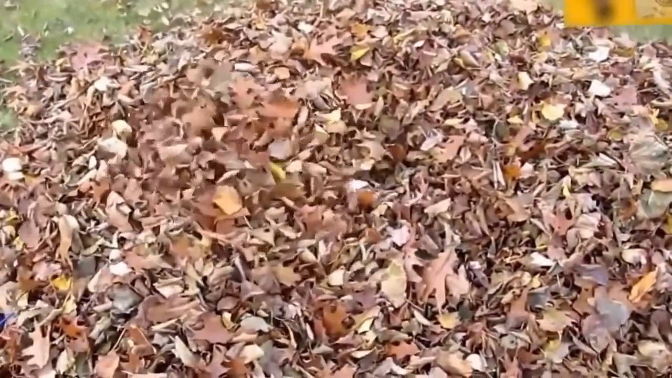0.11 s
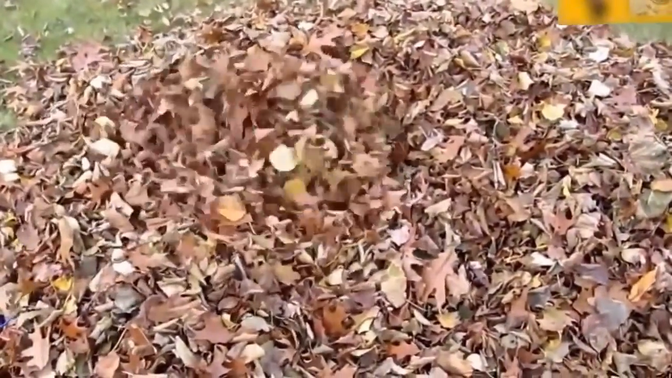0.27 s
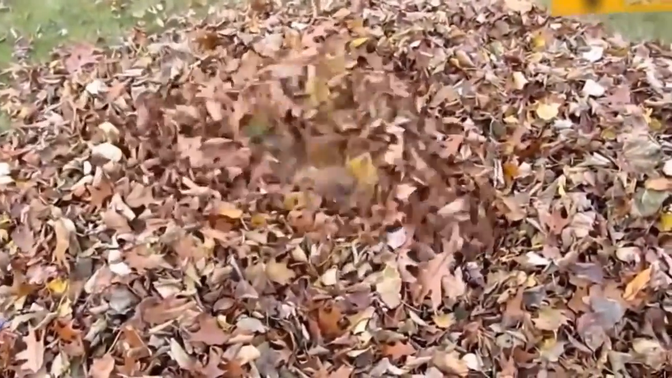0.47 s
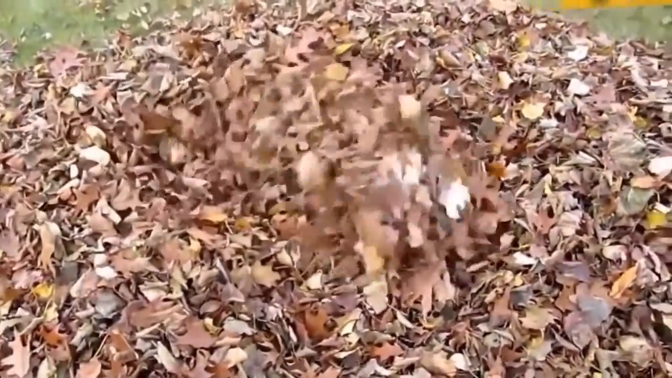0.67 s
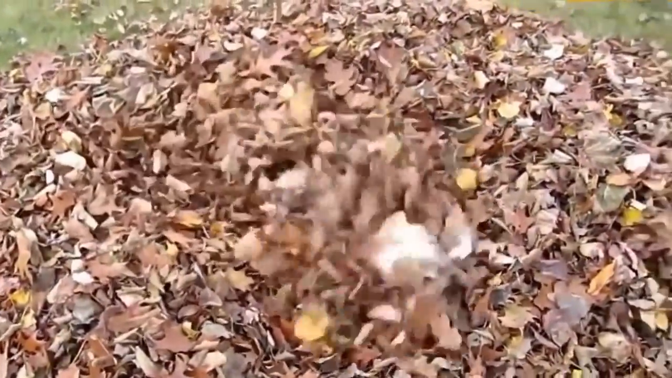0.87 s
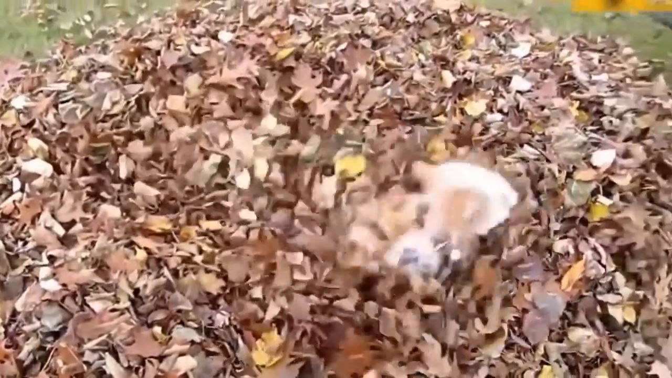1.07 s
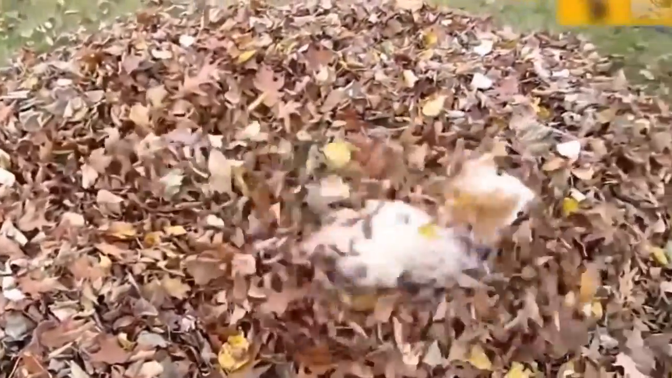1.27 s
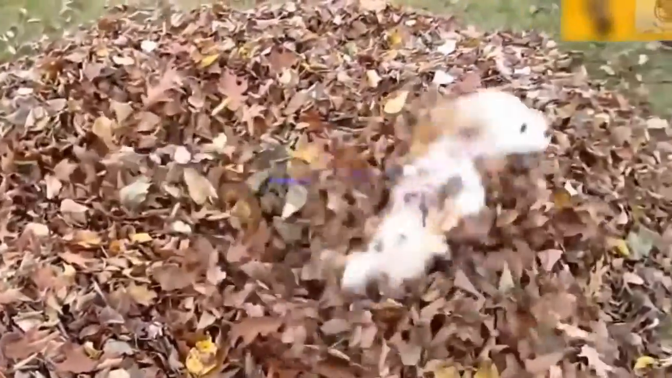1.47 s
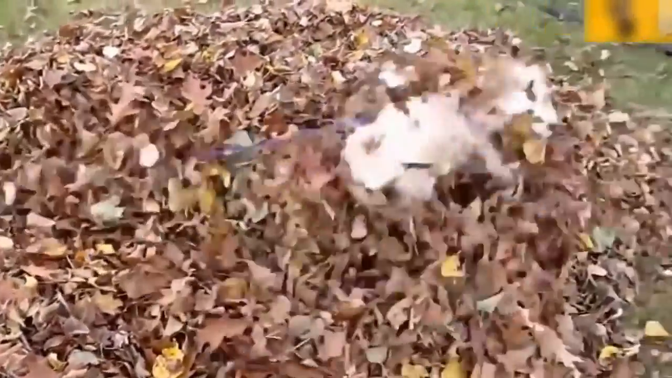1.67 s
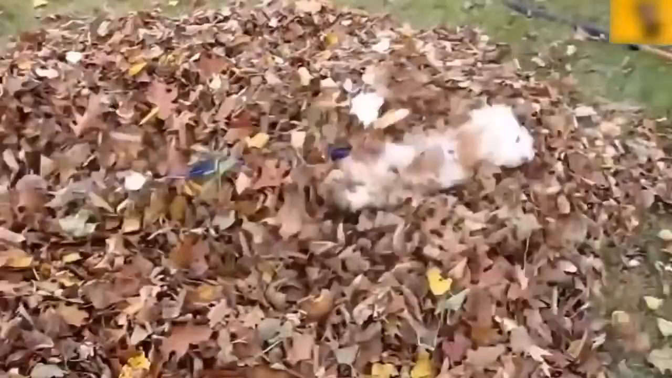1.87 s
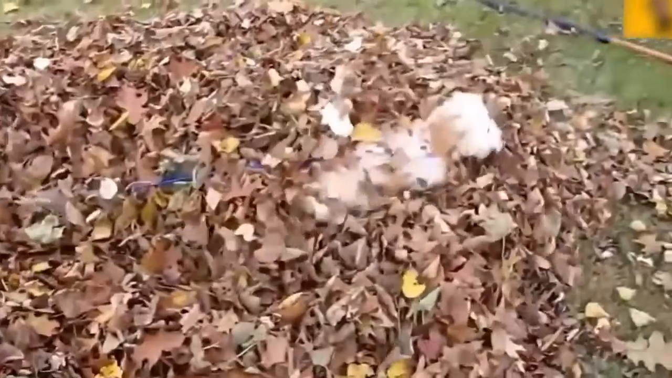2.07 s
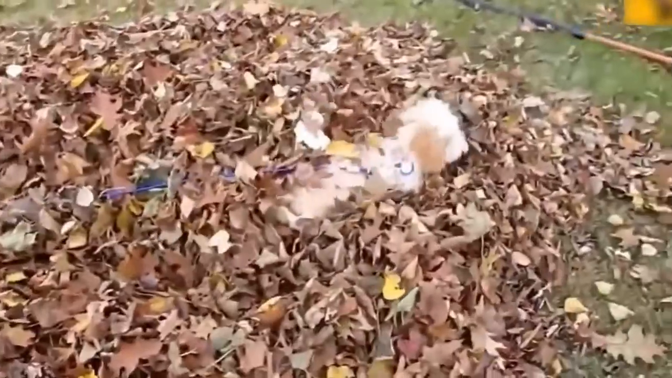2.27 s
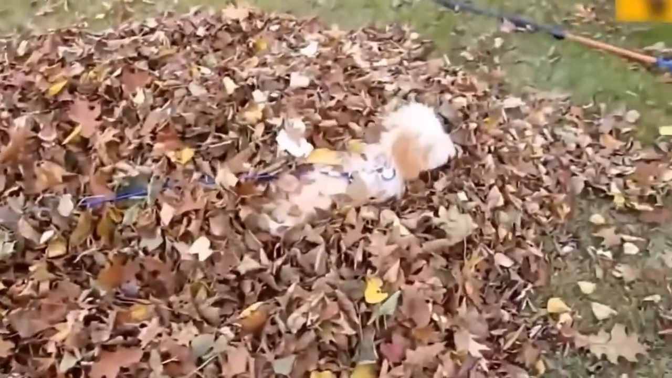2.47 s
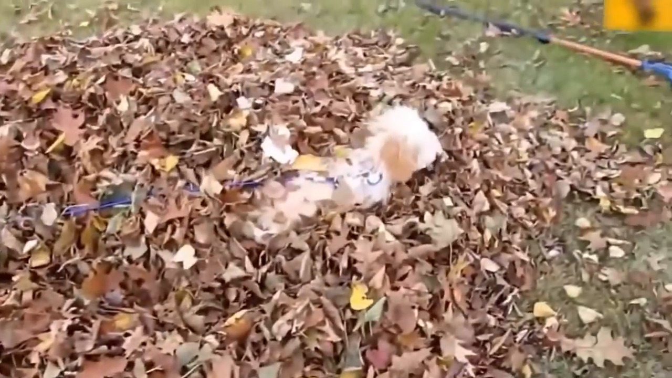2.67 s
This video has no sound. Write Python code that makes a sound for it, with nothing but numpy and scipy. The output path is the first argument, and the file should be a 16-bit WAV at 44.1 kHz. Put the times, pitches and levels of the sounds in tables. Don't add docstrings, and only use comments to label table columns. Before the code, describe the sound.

A small dog thrashes through crisp dry leaves, then the pile settles with scattered ticks.

```python
import sys
import numpy as np
from scipy import signal
from scipy.fft import rfft, irfft
from scipy.io import wavfile
from scipy.ndimage import uniform_filter1d

SR = 44100
rng = np.random.default_rng(int(sys.argv[2]) if len(sys.argv) > 2 else 0)


def store_wav(level_fs):
    pcm = np.round(np.clip(np.atleast_2d(level_fs), -1, 1) * 32767)
    wavfile.write(sys.argv[1], SR, pcm.T.astype(np.int16))


def volts_from_db(level):
    exponent = np.asarray(level, float) / 20
    return 10 ** exponent


N = 125685


def evened(x):
    return x / np.sqrt(np.mean(x ** 2) + 1e-20)


def read(points, hz):
    point_hz, value = np.transpose(points)
    return np.interp(np.log(hz + 1), np.log(point_hz + 1), value)


def add(mix, s, sound):
    part = mix[round(s * SR):][:len(sound)]
    part += sound[:len(part)]


def drift(seconds):
    n = max(round(seconds * SR), 1)
    noise = rng.standard_normal(N)
    return evened(uniform_filter1d(uniform_filter1d(noise, n), n))


def coloured(x, points):
    spectrum, hz = rfft(x), np.fft.rfftfreq(N, 1 / SR)
    usual_size = np.sqrt(uniform_filter1d(abs(spectrum) ** 2, size=1500) + 1e-12)
    return evened(irfft(spectrum / usual_size * volts_from_db(read(points, hz)), N))


def ring(hz, t60, db):
    t = np.arange(round(.3 * SR)) / SR
    soft_start = 1 - np.exp(-4 * t * hz)
    return volts_from_db(db - 60 * t / t60) * np.sin(2 * np.pi * hz * t) * soft_start


def air():
    # pitch in Hz, level in dB per Hz.
    air_colour = [(20, -17), (45, -10), (68, -6), (110, -7), (300, -10), (800, -4.5), (1700, -14),
                  (15600, -42)]
    level_db = -52 + 0.73 * drift(0.02)
    return volts_from_db(level_db) * coloured(rng.standard_normal(N), air_colour)


def paws():
    # start in seconds, level in dB, pitch in Hz, time to fall 60 dB in seconds.
    thuds = [
        (0.013, -30, 77, 0.045),
        (0.287, -41.5, 169, 0.11),
        (.86, -55, 76.4, 0.073),
        (0.957, -50, 75, 0.091),
        (1.15, -45, 67, .08),
        (1.282, -51.5, 154, 0.058),
        (1.647, -50, 70, .08),
        (1.982, -36, 86, 0.073),
        (2.299, -41.5, 71.4, 0.1),
        (2.583, -50, 64, .08),
    ]
    out = np.zeros(N)
    for s, db, hz, t60 in thuds:
        add(out, s, ring(hz, t60, db))
    t = np.arange(4410) / SR
    puff = uniform_filter1d(rng.standard_normal(4410), size=3)
    add(out, .012, puff * volts_from_db(-41 - 60 * t / .06))
    add(out, .0139, -ring(hz=800, t60=.004, db=-24))
    return out


def snaps(rate, count=24):
    size_db, turns = 2, 8.8
    crisp = 0.57
    scrape = 0.78
    size = volts_from_db(size_db * np.minimum(rng.exponential(1, N), 4)) * rng.choice([-1, 1], N)
    hits = size * (rng.random(N) < rate / SR) / np.sqrt(rate)
    leaf, out = rng.integers(0, count, N), np.zeros(N)
    for k, hz in enumerate(np.geomspace(400, 16000, count)):
        t60 = turns / hz ** (1 - crisp) / 1000 ** crisp
        tap = ring(hz, t60, 0)[:2048]
        tap = tap * np.sqrt(hz) / np.linalg.norm(tap)
        out += signal.oaconvolve(hits * (leaf == k), tap)[:N]
    return np.sqrt(1 - scrape) * evened(out) + np.sqrt(scrape) * rng.standard_normal(N)


def field(shape, bins, frames):
    noise = rng.standard_normal(shape[::-1]).T
    return evened(uniform_filter1d(uniform_filter1d(noise, bins, 0), frames, 1))


def patchy(x, edge):
    # pitch in Hz, width in Hz, gain in dB.
    hollows = [(2404, 460, -4), (3750, 950, 3), (4600, 270, -4), (5250, 300, -1), (5940, 310, -3),
               (8700, 1000, -0.5), (13600, 600, -1.5), (780, 120, 1.5)]
    hz, t, z = signal.stft(x, SR, nperseg=1024, noverlap=768)
    hz_column = hz[:, None]
    edge_hz = np.interp(t, *edge)
    streaks = field(z.shape, bins=3, frames=11)
    patches = field(z.shape, bins=9, frames=14)

    streak_db = 1.38 + 2.2 / (1 + np.exp((12000 - hz_column) / 1500))
    db = 0.75 * patches + streak_db * streaks
    db += -6.5 / (1 + np.exp((edge_hz - hz_column) / 420))
    hollow_db = sum(gain_db * np.exp(-((hz - at_hz) / width) ** 2) for at_hz, width, gain_db in hollows)
    db += hollow_db[:, None] * (1 - 0.26 * (edge_hz - 11800) / 1000)
    rear_s, rear_length_s, rear_db = 1.27, .07, -8
    rear_hz = 5150 + 8400 * (t - rear_s)
    db += rear_db * np.exp(-((t - rear_s) / rear_length_s) ** 2 - ((hz_column - rear_hz) / 300) ** 2)

    z = z * (1 - np.exp(-(hz_column / 132) ** 2))
    y = signal.istft(z * volts_from_db(db), nperseg=1024, noverlap=768)[1][:N]
    n = round(.09 * SR)
    slow_power = uniform_filter1d(uniform_filter1d(y ** 2, n), n)
    return y / np.sqrt(slow_power + 1e-12)


def leaves():
    # time in seconds, effort in dB, share of thrown top leaves from 0 to 1, treble edge in Hz.
    thrash = [(0, -52, 0.2, 10600), (.13, -55.5, 0.6, 10000), (.17, -47.5, 0, 10100),
              (.21, -37.5, 0.03, 10100), (0.257, -27, 0, 10300), (0.331, -23.5, 0.68, 10700),
              (.6, -23.5, 0.86, 11600), (.8, -23.5, 0.75, 11600), (.93, -22.6, 0.73, 11900),
              (1.33, -24, 0.91, 12700), (1.6, -24.5, 0.74, 13600), (1.75, -24, 0.93, 13100),
              (1.93, -23.5, 0.84, 13000), (2.059, -23.5, 0.62, 11600), (2.15, -26.5, 0.9, 12600),
              (2.23, -29.5, 0.91, 11800), (2.65, -39.5, 0.6, 11700), (2.85, -53, 0.83, 11600)]
    # pitch in Hz, level in dB per Hz.
    crunch_colour = [(150, -16.5), (480, -12), (800, -1.5), (1500, 0), (3500, -5.5), (6000, -10.5),
                     (9500, -9.5), (15600, -13.5)]
    # pitch in Hz, level in dB per Hz.
    rustle_colour = [(90, -18), (300, -21), (800, -11), (2000, -8), (3800, -3), (6000, -4), (9300, 0.5),
                     (15600, -10)]
    # time in seconds, gain in dB.
    shoves = [(.315, 1), (.391, 1.5), (.475, -0.5), (.6, 0.5), (.718, 0.5), (.778, -2), (.83, -1.2),
              (1.042, -0.7), (1.318, 1.1), (1.536, 1), (1.795, 0), (2.048, 2.5), (2.143, 2.2),
              (2.233, -1.5), (2.279, -2.2), (2.387, 1.5), (2.49, -1.5), (2.562, 1), (2.624, -0.5),
              (2.703, 0.5), (2.766, -1.5), (2.798, 3)]
    clump_db, clump_s, shove_s = 0.79, 0.022, 0.011
    s, effort_db, top, edge_hz = np.transpose(thrash)
    t = np.arange(N) / SR
    db = np.interp(t, s, effort_db)
    top = np.interp(t, s, top)
    rate = 14000 * volts_from_db(np.maximum(db - db.max(), -15))
    crunch = coloured(snaps(rate), crunch_colour) * volts_from_db(clump_db * drift(clump_s))
    rustle = coloured(snaps(rate), rustle_colour) * volts_from_db(clump_db * drift(clump_s))
    db = db + sum(gain_db * np.exp(-((t - at) / shove_s) ** 2 / 2) for at, gain_db in shoves)
    pile = np.sqrt(1 - top) * crunch + np.sqrt(top) * rustle
    return volts_from_db(db) * patchy(pile, (s, edge_hz))


def side_hisses():
    # middle in seconds, level in dB, lowest pitch in Hz, highest pitch in Hz.
    hisses = [(.463, -43.5, 6875, 8300), (.486, -39, 7000, 8300), (.463, -40, 8950, 10330),
              (.486, -42, 8950, 10330), (.602, -37, 6800, 8250), (.997, -43, 5760, 7040),
              (1.043, -35, 10400, 11730), (1.252, -41, 4730, 6300)]
    length_s = .046
    out, n = np.zeros(N), round(length_s * SR)
    hz = np.fft.rfftfreq(n, 1 / SR)
    swell = np.sin(np.pi * np.arange(n) / n)
    for s, db, low_hz, high_hz in hisses:
        band = (hz > low_hz) * (hz < high_hz)
        hiss = irfft(rfft(rng.standard_normal(n)) * band, n)
        add(out, s - length_s / 2, volts_from_db(db) * evened(hiss) * swell)
    return np.array([out, -out])


def stems():
    # time in seconds, level in dB.
    cracks = [
        (.5549, -18),
        (.6651, -18),
        (.7162, -18),
        (1.2153, -14),
        (2.1391, -19),
        (2.2519, -24),
    ]
    crack_hz = 7000
    click = -evened(ring(crack_hz, .0012, 0)[:8])
    out = np.zeros(N)
    for s, db in cracks:
        add(out, s - .25 / crack_hz, click * volts_from_db(db))
    return out


def last_leaves():
    # start in seconds, level in dB, pitch in Hz, time to fall 60 dB in seconds.
    drops = [
        (1.503, -24.5, 12450, .05),
        (2.353, -29, 7600, 0.0054),
        (2.67, -34, 11000, 0.0061),
        (2.694, -41, 8600, .01),
        (2.715, -27, 9000, .005),
        (2.792, -40, 4000, .03),
        (2.802, -41, 4030, 0.0089),
        (2.803, -36, 11000, .005),
        (2.818, -37, 8000, .004),
    ]
    out = np.zeros(N)
    for s, db, hz, t60 in drops:
        add(out, s, ring(hz, t60, db))
    return out


def scene():
    return np.tile(air() + paws() + leaves() + stems() + last_leaves(), (2, 1))


def top_cut(x):
    return signal.sosfilt(signal.butter(12, 15710, fs=SR, output="sos"), x)


def record(dry):
    passed = np.fft.rfftfreq(N, 1 / SR) < 15650
    heard = irfft(rfft(dry) * passed, N) + side_hisses()
    return top_cut(heard)


dry = scene()
out = record(dry)
store_wav(out)
```